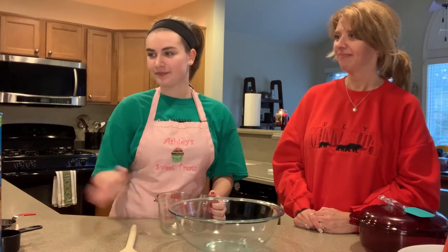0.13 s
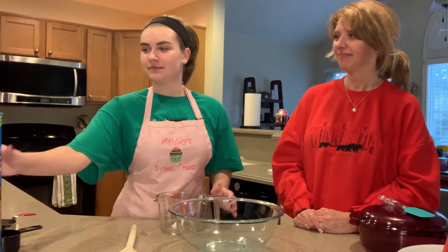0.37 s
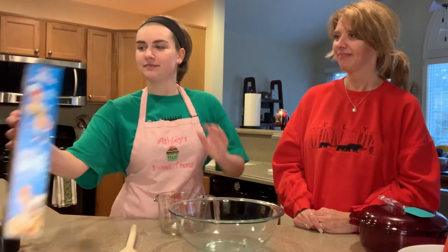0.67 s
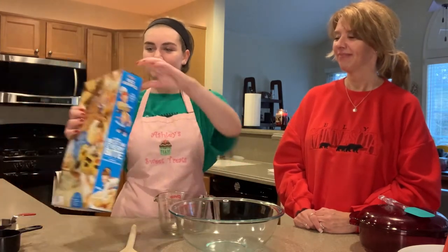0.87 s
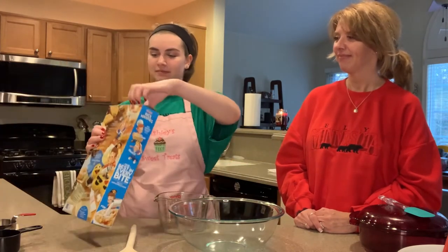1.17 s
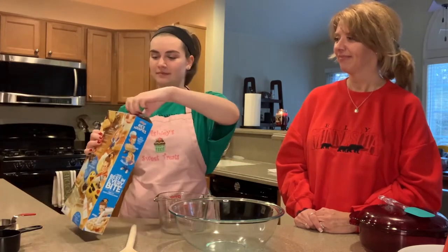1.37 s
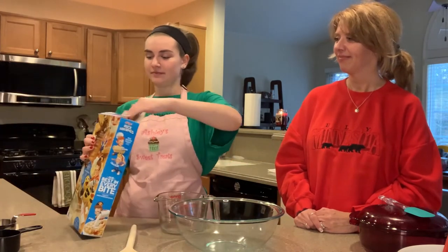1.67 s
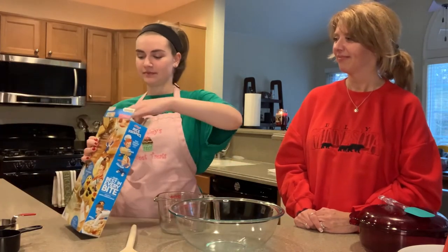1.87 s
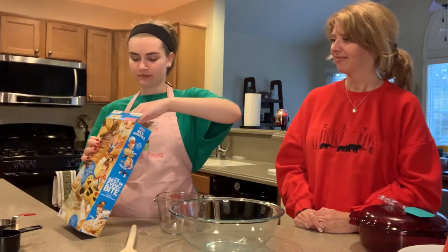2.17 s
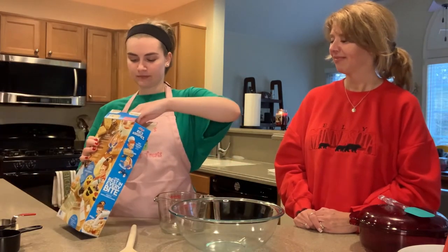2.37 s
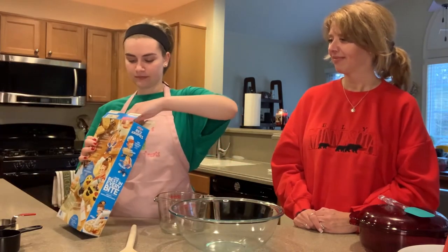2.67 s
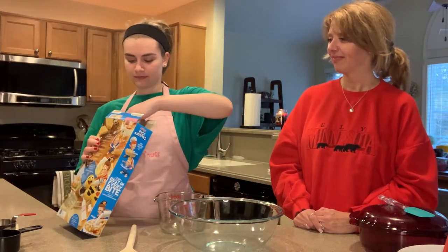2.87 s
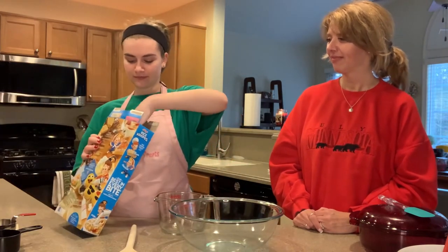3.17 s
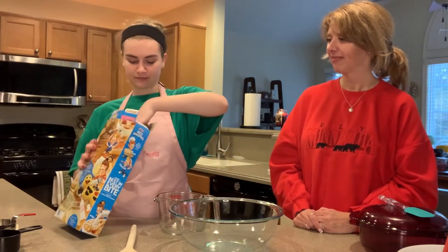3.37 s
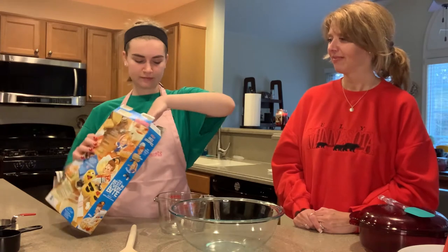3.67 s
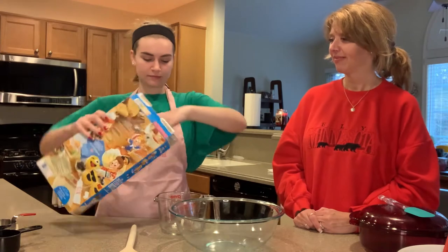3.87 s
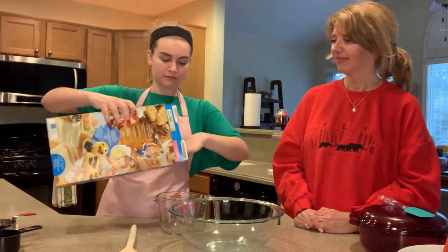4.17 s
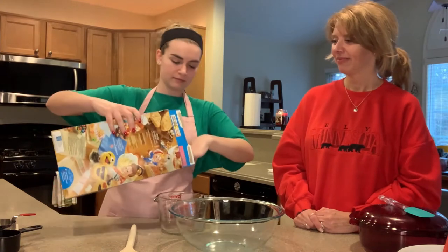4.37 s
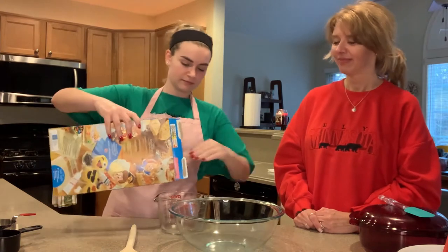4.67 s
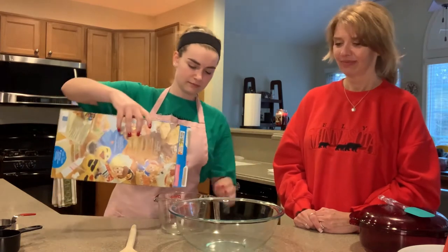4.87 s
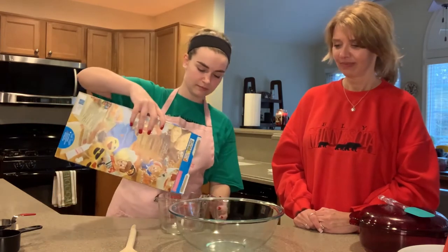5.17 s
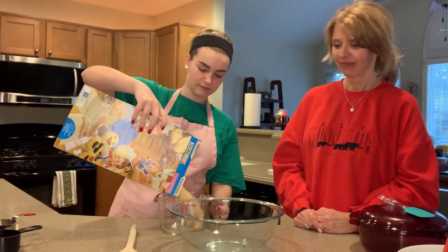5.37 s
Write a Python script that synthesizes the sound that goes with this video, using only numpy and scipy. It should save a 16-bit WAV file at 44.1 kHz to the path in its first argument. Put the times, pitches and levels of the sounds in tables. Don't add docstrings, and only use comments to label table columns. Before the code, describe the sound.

Light paper scuffs and flap ticks come first, then small bumps and a hard box landing at about 1.4 seconds, a softer one near 1.75. A quieter spell of thin film ticks leads into dense bag rustling and cardboard rubbing around three seconds. After a brief lull, tilting rustle and a dry grain trickle ring a glass vessel. Close stereo microphone, lively kitchen, very quiet low hum.

```python
import sys
import numpy as np
from scipy import signal
from scipy.fft import rfft, irfft, next_fast_len
from scipy.io import wavfile
from scipy.ndimage import uniform_filter1d

SR = 44100
rng = np.random.default_rng(int(sys.argv[2]) if len(sys.argv) > 2 else 0)


def amplitude_ratio(level_db):
    exponent = np.asarray(level_db, float) / 20
    return 10 ** exponent


def dump(signal):
    limited = np.clip(np.atleast_2d(signal).T, -1, 1)
    pcm = np.round(limited * 32767).astype(np.int16)
    wavfile.write(sys.argv[1], SR, pcm)


N = 243431

# f/Hz, level/dB
WALL_BOOM = [(120, -4.5), (250, -4), (500, -3.5), (800, -3.5), (1100, -20), (1600, -52)]
# f/Hz, level/dB
CARD_SCUFF = [(700, -15), (1100, 4), (1700, 1.5), (2600, -1.5), (3200, -16.5), (4200, -19.5)]
# f/Hz, level/dB
BAG_RASP = [(2000, -30), (3200, 0), (4500, -2), (6000, -3), (7200, -5), (10000, -30)]
# f/Hz, level/dB
FILM_CRISP = [(5000, -30), (7400, -2), (8500, 0), (10500, -1), (12500, -3), (14500, -5), (16500, -11)]
# t/s, effort on the
# cardboard/dB, effort on the bag/dB
DYING_AWAY = [(0.0, -46.5, -80), (0.03, -56.5, -109), (0.18, -85, -98), (0.278, -84, -99)]
# t/s, cardboard/dB, bag/dB
SLIDING_OFF = [(0.284, -51, -88), (0.3, -49, -72), (0.32, -48.5, -62), (0.36, -51, -61), (0.41, -51.5, -57),
               (0.484, -54, -60), (0.556, -65.5, -76), (0.73, -64, -80)]
# t/s, cardboard/dB, bag/dB
CARRYING = [(0.76, -60, -62), (0.82, -63, -68), (0.885, -65, -67.5), (0.924, -62, -60), (0.994, -53, -67),
            (1.08, -61, -67), (1.168, -64, -66), (1.278, -57.5, -69)]
# t/s, cardboard/dB, bag/dB
JOLTED = [(1.36, -51, -55), (1.385, -44, -41.5), (1.415, -49, -39), (1.44, -49, -46), (1.47, -49, -48)]
# t/s, cardboard/dB, bag/dB
SETTLING = [(1.49, -50, -48), (1.536, -50, -53.5), (1.642, -56, -54.5), (1.725, -61, -62.5),
            (1.75, -55, -52), (1.81, -50, -47.5), (1.874, -52.5, -65), (1.96, -55, -58.5),
            (2.03, -56, -50.5)]
# t/s, cardboard/dB, bag/dB
RESTING = [(2.08, -65, -65), (2.125, -67.5, -70), (2.17, -70, -56)]
# t/s, cardboard/dB, bag/dB
OPENING = [(2.2, -56, -62), (2.266, -70, -76), (2.28, -58.5, -56), (2.36, -53.5, -49), (2.54, -62.5, -59),
           (2.57, -58, -47), (2.666, -54.5, -53), (2.748, -55, -50)]
# t/s, cardboard/dB, bag/dB
UNROLLING = [(2.77, -45.5, -39), (2.79, -54, -47.5), (2.876, -48.5, -42.5), (2.952, -55, -53.5)]
# t/s, cardboard/dB, bag/dB
REACHING_IN = [(2.976, -43, -42.5), (3.018, -41, -40), (3.146, -50, -47), (3.29, -40, -38),
               (3.33, -38.5, -44.5), (3.364, -40.5, -41), (3.576, -45.5, -45), (3.69, -46.5, -45.5),
               (3.81, -52, -60)]
# t/s, cardboard/dB, bag/dB
LIFTING = [(3.844, -49, -43.5), (3.944, -51, -45), (4.044, -42.5, -40), (4.266, -48, -50.5),
           (4.374, -47.5, -47), (4.46, -48.5, -50), (4.53, -61.5, -64), (4.636, -67, -71),
           (4.72, -65.5, -74)]
# t/s, cardboard/dB, bag/dB
TILTING = [(4.76, -69, -78), (4.84, -64, -79), (4.89, -61.5, -70), (4.96, -57, -61), (5.04, -51, -54),
           (5.11, -46, -44), (5.17, -42.5, -42), (5.24, -45.5, -45), (5.29, -50, -47.5)]
# t/s, cardboard/dB, bag/dB
EMPTYING = [(5.38, -47.5, -47), (5.47, -47, -44), (5.52, -50, -48)]


def evened(x):
    return x / np.sqrt(np.mean(x ** 2) + 1e-20)


def read(points, hz):
    f, value = np.transpose(points)
    return np.interp(np.log(hz + 1), np.log(f + 1), value)


def played(rows):
    s, *columns = np.transpose(rows)
    return [np.interp(np.arange(N) / SR, s, c) for c in columns]


def coloured(x, points):
    size = next_fast_len(x.shape[-1], real=True)
    hz = np.fft.rfftfreq(size, 1 / SR)
    inside = (hz >= points[0][0]) & (hz <= points[-1][0])
    spectrum = rfft(x, size) * amplitude_ratio(read(points, hz)) * inside
    return evened(irfft(spectrum, size)[..., :x.shape[-1]])


def rung(x, modes):
    t = np.arange(SR // 4) / SR
    ring = sum(amplitude_ratio(db - 60 * t / t60) * np.sin(2 * np.pi * hz * t) for hz, db, t60 in modes)
    return signal.oaconvolve(x, ring[None] / np.linalg.norm(ring), axes=1)[:, :x.shape[1]]


def crackle(per_s, spread_db, clump_db, clump_s):
    clumps = evened(uniform_filter1d(rng.standard_normal(N), max(int(clump_s * SR), 2)))
    size = amplitude_ratio(spread_db * np.minimum(rng.exponential(1, N), 5) + clump_db * clumps)
    clicks = rng.random(N) < per_s / SR
    return evened(size * clicks * rng.standard_normal((2, N)))


def patchy(x, depth_db, bins, frames):
    hz, t, z = signal.stft(x, SR, nperseg=256)
    patches = uniform_filter1d(rng.standard_normal(z.shape[1:]), bins, axis=0)
    patches = evened(uniform_filter1d(patches, frames, axis=1))
    return signal.istft(z * amplitude_ratio(depth_db * patches), SR, nperseg=256)[1][:, :N]


def handling():
    # curve, wall boom against scuff/dB, film crispness and box mouth against rasp/dB
    gestures = [(DYING_AWAY, 5.9, -2.1, -24), (SLIDING_OFF, 0.1, -11, -3), (CARRYING, 2.4, -11.5, -25),
                (JOLTED, 3, -12, -12), (SETTLING, 5.1, -8, -4), (RESTING, 4.2, -11, 0),
                (OPENING, 1.1, -4.5, -8.5), (UNROLLING, 3.5, -0.88, -6.5), (REACHING_IN, 0.11, -0.32, -8.5),
                (LIFTING, 1.33, -2.45, -7), (TILTING, -0.54, -2.13, -3.3), (EMPTYING, -1.41, -1.8, -2.9)]
    # f/Hz, level/dB
    mouth_air = [(2100, -19), (2550, -11), (2750, -9), (2950, -5.5), (3500, -34)]
    rows = []
    for curve, boom, crisp, mouth in gestures:
        for s, card, bag in curve:
            rows.append((s, card, card + boom, bag, bag + crisp, bag + mouth))
    scuff_db, boom_db, rasp_db, crisp_db, mouth_db = played(rows)
    slips = crackle(4000, spread_db=0.8, clump_db=1.0, clump_s=0.02)
    creases = crackle(8000, spread_db=2.8, clump_db=1.6, clump_s=0.005)
    paper = amplitude_ratio(scuff_db) * coloured(slips, CARD_SCUFF) + amplitude_ratio(boom_db) * coloured(slips, WALL_BOOM)
    film = amplitude_ratio(rasp_db) * coloured(creases + 3.7 * slips, BAG_RASP)
    film += amplitude_ratio(crisp_db) * coloured(creases, FILM_CRISP)
    mouth = amplitude_ratio(mouth_db) * coloured(creases, mouth_air)
    return patchy(paper + film + mouth, depth_db=1.9, bins=5, frames=14)


def knocks(rows, ring, cycles, scuff, rasp, body, rise_s):
    # f/Hz, level/dB, t60/s
    box_modes = [(161, -37, .08), (215, -27, .08), (357, -17, 0.11), (643, -19, 0.07), (682, 27, 0.045),
                 (900, -27, 0.073), (1050, -4, 0.057), (1780, -5, 0.21)]
    t = np.arange(4096) / SR
    out, thump = np.zeros((2, 2, N + len(t)))
    quarter_turn = np.array([[0], [1 / 4]])
    for s, db, boom_db, crisp_db, hz, t60 in rows:
        puff = rng.standard_normal((2, len(t)))
        at = slice(round(s * SR), round(s * SR) + len(t))
        start = amplitude_ratio(db - 4.5) * (1 - np.exp(-t / rise_s))
        panel = ring * np.sin(2 * np.pi * (hz * t + quarter_turn)) * amplitude_ratio(-60 * hz * t / cycles)
        bright = scuff * coloured(puff, CARD_SCUFF) + rasp * coloured(puff, BAG_RASP)
        bright += amplitude_ratio(crisp_db + 5.5) * coloured(puff, FILM_CRISP)
        low = amplitude_ratio(boom_db + 4.5) * coloured(puff, WALL_BOOM)
        dying = amplitude_ratio(-60 * t / np.clip(t60, .005, .12))
        out[:, at] += start * (panel + (bright + low) * dying)
        thump[:, at] += start * amplitude_ratio(boom_db - 60 * t / .03) * puff
    return (out + body * rung(thump, box_modes))[:, :N]


def on_card(rows, crisp_db, t60):
    return [(s, db, weight_db, crisp_db, hz, t60) for s, db, weight_db, hz in rows]


def on_film(rows, boom_db, t60):
    return [(s, db, boom_db, crisp_db, hz, t60) for s, db, crisp_db, hz in rows]


def bumps():
    # t/s, peak/dB, weight/dB, ring f/Hz
    thuds = [(0.296, -46, 8, 276), (0.6526, -58, 5, 624), (0.7442, -48.5, 5.5, 357), (0.7721, -49, 4, 510),
             (0.84, -43, -2, 510), (0.8997, -38, -2.5, 1510), (0.9144, -36, -2.5, 518),
             (1.0337, -60.5, 23, 250), (1.1036, -38.5, 5.5, 255.3), (1.1134, -40.5, -17, 590),
             (1.15, -41, 5.5, 250), (1.165, -40.5, -5, 276), (1.283, -40.5, -0.5, 1240),
             (1.3017, -48, -9, 250), (3.1014, -38.5, -3, 258.9)]
    # t/s, peak/dB, weight/dB, ring f/Hz
    landings = [
        (1.3687, -10.5, -11.5, 775),
        (1.3784, -17, -6, 900),
        (1.3894, -17.5, -15, 607),
    ]
    out = knocks(on_card(thuds, -28.0, t60=0.13), ring=2.64, cycles=33.5,
                 scuff=0.73, rasp=0.24, body=1.0, rise_s=0.00016)
    return out + knocks(on_card(landings, -29, t60=0.062), ring=2.77, cycles=17.0,
                        scuff=0.62, rasp=0.28, body=1.22, rise_s=0.00073)


def flap_pops():
    # t/s, peak/dB, weight/dB, ring f/Hz
    pops = [(0.0937, -58, -20, 3180), (0.2877, -48, -26, 1680), (0.3032, -40, -5, 1200),
            (0.35, -38, -11, 3370), (0.408, -33, -4, 3220), (0.445, -46, -7, 4140),
            (0.4779, -34.5, -6, 3330), (0.9513, -31.5, 5.5, 1400), (0.9603, -31.5, -6, 1370),
            (2.7203, -39, -5, 2780), (3.3075, -18.5, -5.5, 1416), (3.9493, -44, -9, 2860),
            (4.0099, -42, -9, 1180), (4.0494, -29, -26, 2731), (5.1588, -44, -32, 2822)]
    # t/s, peak/dB, weight/dB, ring f/Hz
    set_upright = [(1.7492, -27.5, -2.5, 804), (1.757, -30.5, 4, 308), (1.7648, -19.5, -1, 726),
                   (1.7798, -21, -5, 695), (1.7952, -26.5, -2, 267)]
    out = knocks(on_card(pops, -26, t60=0.051), ring=3.65, cycles=25.0,
                 scuff=0.66, rasp=0.23, body=0.097, rise_s=0.00053)
    return out + knocks(on_card(set_upright, -25, t60=0.054), ring=2.7, cycles=17.0,
                        scuff=0.74, rasp=0.28, body=1.5, rise_s=0.00085)


def bag_snaps():
    # t/s, peak/dB, crispness/dB, ring f/Hz
    ticks = [(0.0001, -43.5, -12, 5170), (1.0692, -43.5, -10, 1980), (1.365, -21.5, -16, 1960),
             (1.3688, -18, -13.5, 6270), (1.7756, -21, -7, 2380), (2.136, -37, -12, 6343),
             (2.2744, -48, 2, 3770), (2.4852, -40, -5, 5140), (2.5194, -40, -3, 6540),
             (4.4746, -45, 9, 3045), (4.5629, -41, -35, 2337), (4.6284, -43.5, -10, 2553),
             (4.6774, -46, -14, 4460)]
    # t/s, peak/dB, crispness/dB, ring f/Hz
    snaps = [(1.1294, -41, -13, 6440), (1.4899, -41, 0, 4267), (1.5704, -43.5, 5.5, 4870),
             (1.5856, -34.5, -15, 4505), (1.6554, -35, -17, 4880), (2.0095, -34, -11, 6634),
             (2.1497, -37, -14, 6770), (2.3224, -34, -5, 6480), (2.4094, -38, -3.5, 6060),
             (2.559, -38, -5.5, 5190), (2.7635, -33.5, -10, 6383), (2.8194, -39, -12, 6660),
             (2.8611, -26.5, -6.5, 6580), (2.884, -42, 4, 6090), (2.9652, -42, 8, 5880),
             (3.3595, -42, 12, 5290), (3.7044, -47, -6, 4160), (3.8292, -36, -2, 6000),
             (4.3108, -39, -3, 6470)]
    out = knocks(on_film(ticks, -2.5, t60=0.022), ring=0.93, cycles=24.0,
                 scuff=0.64, rasp=0.76, body=0.04, rise_s=0.000043)
    return out + knocks(on_film(snaps, -8.0, t60=0.065), ring=0.37, cycles=40.,
                        scuff=0.75, rasp=0.66, body=0.12, rise_s=0.0022)


def nail_taps():
    # t/s, peak/dB, crispness/dB, ring f/Hz
    nails = [(0.188, -58, -8, 6460), (0.7447, -43, -14, 4360), (0.762, -52, -18, 4220),
             (0.773, -52, -12, 5900), (0.833, -53, -12, 4500), (0.841, -40, -18, 4404),
             (0.8995, -33, -24, 5930), (0.914, -50, -10, 5700), (0.9497, -45, -7, 6000),
             (1.5564, -41.5, 5, 6000), (1.645, -47, 3, 5040), (1.7619, -31, -2, 3850),
             (1.7655, -37, 1, 6200), (2.7208, -36, -2.5, 6400), (3.1732, -41, 6, 6500),
             (3.6032, -46, -6, 4243), (3.947, -42, 4, 6000), (4.432, -42, -12, 3306),
             (2.3227, -40, 2, 6400), (2.9667, -38, 4, 6000), (0.4125, -52, 4, 4200)]
    return knocks(on_film(nails, -29, t60=0.016), ring=3.0, cycles=35.,
                  scuff=0.2, rasp=0.4, body=0.01, rise_s=0.00033)


def friction(rows, sharpness):
    out = np.zeros((2, N))
    for s, length, db, hz in rows:
        t = np.arange(0, length, 1 / SR)
        r = np.exp(-np.pi * hz / sharpness / SR)
        slow = signal.lfilter([1], np.poly([r, r]), rng.standard_normal((2, 2, len(t))))
        tone = ((slow[0] + 1j * slow[1]) * np.exp(2j * np.pi * hz * t)).real
        stroke = np.sin(np.pi * t / length)
        out[:, round(s * SR):][:, :len(t)] += amplitude_ratio(db) * evened(tone) * stroke
    return out


def rubs():
    # start t/s, length/s, level/dB, f/Hz
    singing = [(1.278, 0.048, -51, 1300), (1.29, 0.065, -52, 2100), (1.43, 0.05, -46, 800),
               (1.727, 0.032, -44, 720), (2, .03, -50, 2700), (1.83, 0.076, -48, 720),
               (1.827, 0.045, -51, 2620), (1.827, 0.061, -51, 4000), (3.241, 0.06, -41, 2000),
               (3.328, .035, -45, 2750), (5.115, 0.082, -41, 2664), (1.9, 0.045, -42, 252),
               (1.755, 0.06, -38.5, 560), (1.37, 0.052, -37, 380), (2.93, 0.074, -46, 200),
               (1.76, 0.052, -37, 188.6), (0.287, 0.082, -61, 2000), (1.368, 0.025, -27.5, 1690),
               (5.116, 0.067, -39, 2880), (5.1, 0.038, -44, 1790), (5.16, 0.049, -42, 1760),
               (5.122, 0.083, -48, 1320), (5.15, 0.062, -46, 4110), (5.186, .06, -57, 3500)]
    # start t/s, length/s, level/dB, f/Hz
    sweeps = [(0.283, .05, -52, 1500), (1.367, .045, -32, 1500), (1.752, .06, -34, 620),
              (0.32, 0.21, -51.5, 3296), (0.37, 0.17, -57, 4300), (1.375, 0.085, -41, 4200),
              (1.74, 0.13, -46.5, 2595), (4.68, 0.056, -65, 4500), (4.86, .12, -65, 3500)]
    return friction(singing, sharpness=17) + friction(sweeps, sharpness=4.5)


def pour():
    # t/s, level/dB
    landing = [(5.25, -38), (5.26, -38.5), (5.296, -33.5), (5.398, -32.5), (5.404, -34), (5.52, -35)]
    # f/Hz, level/dB
    grain = [(1500, -22), (3000, -9), (4400, -4), (5600, -7), (7300, -2), (10500, 0), (14500, -2),
             (16000, -5)]
    # f/Hz, level/dB, t60/s
    glass = [(4540, 0, 0.04), (4150, -3, 0.03), (7280, -1, 0.04), (8050, 0, 0.03), (8600, 4, 0.05),
             (9700, 1, 0.025), (10050, 0, 0.03), (12900, -4, 0.02), (14700, -2, 0.02)]
    level_db, = played([(landing[0][0] - .03, -90)] + list(landing))
    ticks = coloured(crackle(9000, spread_db=0.64, clump_db=0.19, clump_s=0.012), grain)
    wall = evened(rung(crackle(600, spread_db=4.5, clump_db=2, clump_s=0.031), glass))
    return amplitude_ratio(level_db) * (ticks + .4 * wall)


def engine():
    # t/s, cycle rate f/Hz, idle throb/dB, load/dB
    running = [(0, 23.7, -43, -42.5), (.6, 21.2, -56, -45.5), (1.1, 22.8, -46, -45.5), (1.7, 21, -44, -44),
               (2.2, 21.3, -43.5, -75), (2.6, 20.3, -46.5, -40), (3, 20.9, -41, -36.5),
               (3.6, 20.2, -45, -32.5), (4.1, 19.9, -49, -38), (4.5, 20.1, -71, -42),
               (4.9, 19.7, -60, -40.5), (5.2, 18.6, -47.5, -39.5), (5.52, 22, -47.5, -47.5)]
    # order, level/dB
    faint_orders = [(2, -60), (3, -62), (8, -60)]
    hz, idle_db, load_db = played(running)
    uneven = evened(uniform_filter1d(rng.standard_normal(N), size=4000))
    waver = 0.01205
    turn = 2 * np.pi * np.cumsum(hz * (1 + waver * uneven)) / SR
    orders = [(4, idle_db), (5, load_db), (6, load_db - 20)] + list(faint_orders)
    out = np.zeros(N)
    for k, db in orders:
        out += np.sqrt(2) * amplitude_ratio(db) * np.sin(k * turn + 2 * np.pi * rng.random())
    return out


def fridge():
    # f/Hz, level/dB
    lines = [(56.3, -52.5), (112, -67), (140.6, -51.5), (345, -60)]
    t = np.arange(N) / SR
    out = np.zeros(N)
    for hz, db in lines:
        wander_db = 0.5 * evened(uniform_filter1d(rng.standard_normal(N), SR // 5))
        out += np.sqrt(2) * amplitude_ratio(db + wander_db) * np.sin(2 * np.pi * (hz * t + rng.random()))
    return out


def room_air():
    # f/Hz, level/dB
    air_colour = [(20, -25), (45, -8), (100, 4.5), (160, -7.5), (250, -13.5), (350, -14), (430, -19),
                  (600, -21.5), (1000, -37.5), (2500, -57), (4000, -46), (8000, -53.5), (16000, -52)]
    return amplitude_ratio(-46.5) * coloured(rng.standard_normal((2, N)), air_colour)


def tails():
    # f/Hz, t60/s
    kitchen = [(200, 0.32), (530, 0.33), (1400, 0.42), (3700, 0.67), (9700, 0.24)]
    taps = np.zeros((2, SR))
    at = np.arange(120, SR - 20, 20) + rng.integers(0, 20, (2, (SR - 121) // 20))
    np.put_along_axis(taps, at, rng.choice([-1., 1.], at.shape), 1)
    hz, t, z = signal.stft(taps, SR, nperseg=256)
    z = z * amplitude_ratio(-60 * t / read(kitchen, hz)[:, None])
    z = z / np.linalg.norm(z, axis=2, keepdims=True)
    tail = signal.istft(z, SR, nperseg=256)[1]
    tail[:, :120] = 0
    return tail / np.linalg.norm(tail, axis=1, keepdims=True)


def ports(views, likeness, radians, hz):
    # f/Hz, level/dB
    left_lean = [(60, 1.4), (150, 0), (300, 0), (600, 2), (1000, 5), (1600, 2.2), (2500, 2), (4000, .5),
                 (6000, -.4), (8000, 0)]
    same, lean = np.clip(read(likeness, hz), 0, 1), amplitude_ratio(read(left_lean, hz) / 2)
    delay = np.exp(-1j * np.interp(hz, *np.transpose(radians)))
    right = (same * views[0] + np.sqrt(1 - same ** 2) * views[1]) * delay
    return np.array([views[0] * lean, right / lean])


def scene():
    # f/Hz, level/dB
    wetness = [(200, -2), (1000, -2), (3000, -4), (7000, -7), (15000, -11)]
    # f/Hz, likeness 0-1
    box_same = [(60, .96), (200, .7), (500, .5), (1500, .45), (3000, .45), (6000, .5), (7600, .8),
                (9000, .85), (10300, .75), (12500, .85), (15000, .78)]
    # f/Hz, phase/rad
    box_lead = [(0, .2), (100, .55), (200, .6), (330, 1.3), (520, 1.45), (1290, .9), (2400, 2.0),
                (6400, 5.0), (7700, 3.4), (8900, 2.9), (11600, .35), (13400, -.3), (15200, -2.7),
                (16000, -3.2)]
    # f/Hz, likeness 0-1
    cup_same = [(1500, .4), (3500, .5), (4700, .88), (5800, .9), (6800, .6), (8500, .9), (12500, .92),
                (15000, .8)]
    # f/Hz, phase/rad
    cup_lead = [(0, 0), (2400, 1.2), (4300, 2.2), (4900, 3.0), (5600, 3.4), (6500, 4.8), (7300, 4.6),
                (7900, 3.8), (8550, 3.1), (9300, 2.2), (11300, .7), (11900, 0), (13000, -.1), (14800, -1.8),
                (16000, -3.2)]
    size = next_fast_len(N + SR, real=True)
    hz = np.fft.rfftfreq(size, 1 / SR)
    wet, tail = amplitude_ratio(read(wetness, hz)), rfft(tails(), size)
    room = (1 + wet * tail) / np.sqrt(1 + wet ** 2)
    near = (1 + amplitude_ratio(-6) * wet * tail) / np.sqrt(1 + wet ** 2)
    box = handling() + bumps() + bag_snaps() + nail_taps() + rubs()
    background = room_air()
    background[0] += engine() + fridge()
    views = rfft(box, size) * room + rfft(flap_pops(), size) * near + rfft(background, size)
    cup = rfft(pour(), size) * room
    both = ports(views, box_same, box_lead, hz) + ports(cup, cup_same, cup_lead, hz)
    return irfft(both, size)[:, :N]


def band_limit(x):
    return signal.sosfilt(signal.butter(12, 16450, fs=SR, output="sos"), x)


def record(dry):
    return band_limit(dry)


dry = scene()
out = record(dry)
dump(out)
```